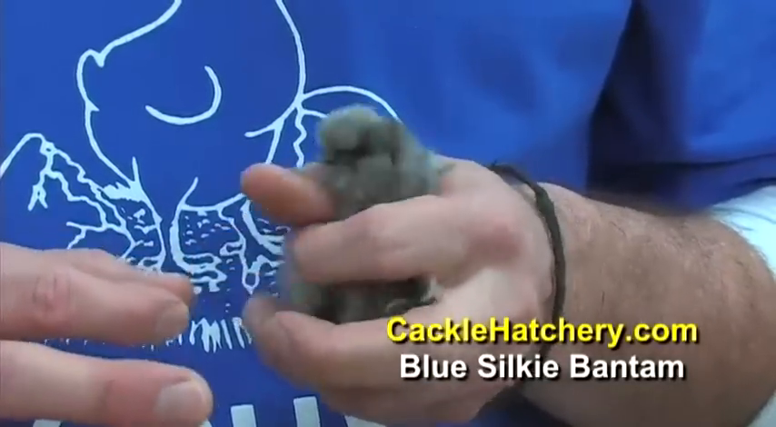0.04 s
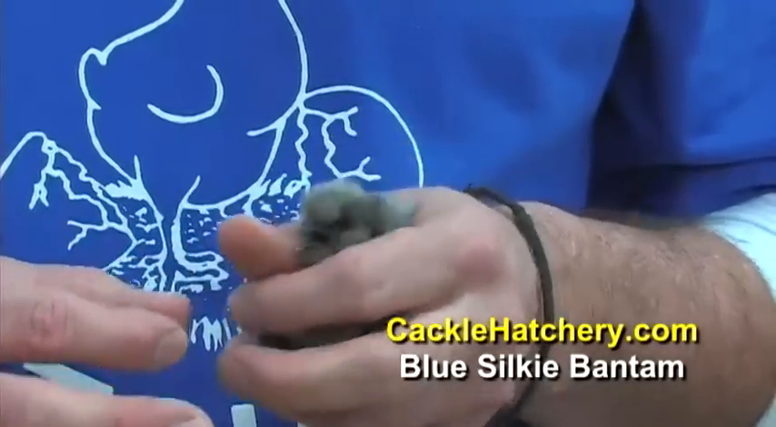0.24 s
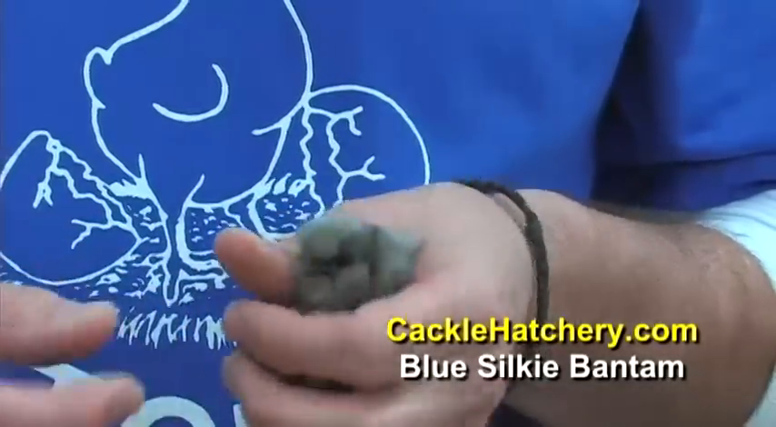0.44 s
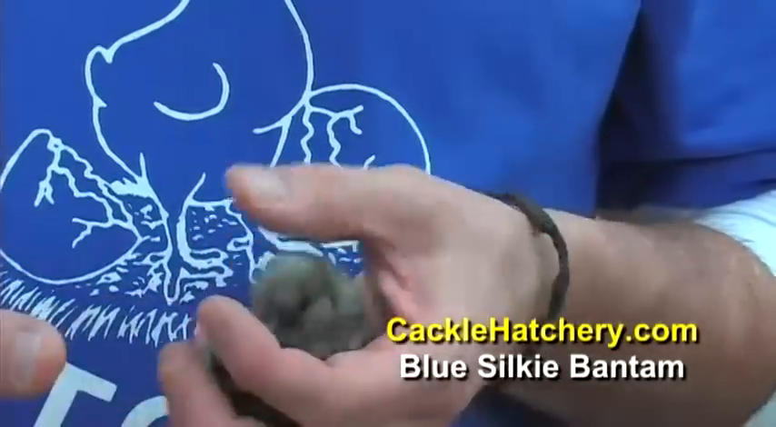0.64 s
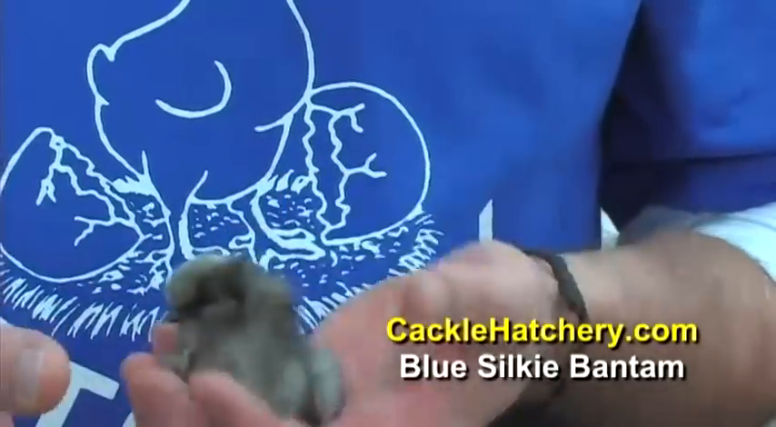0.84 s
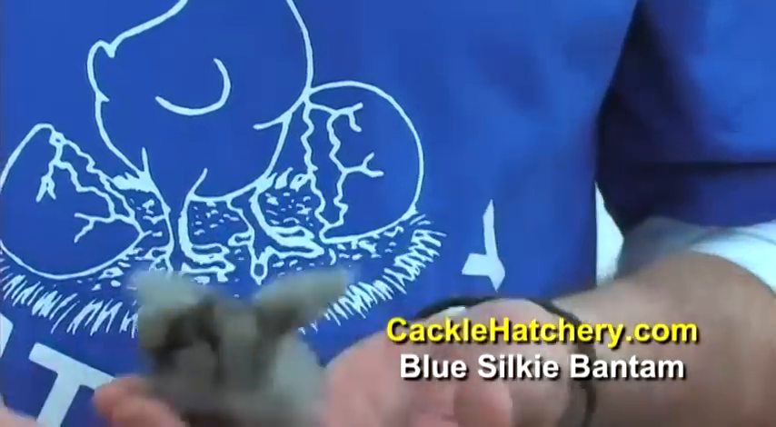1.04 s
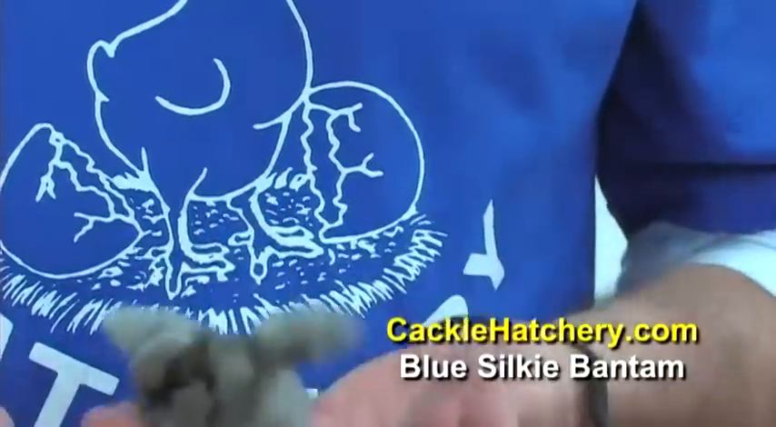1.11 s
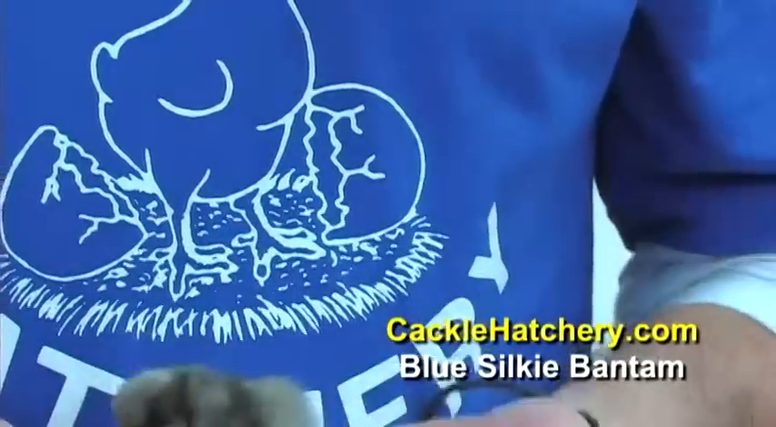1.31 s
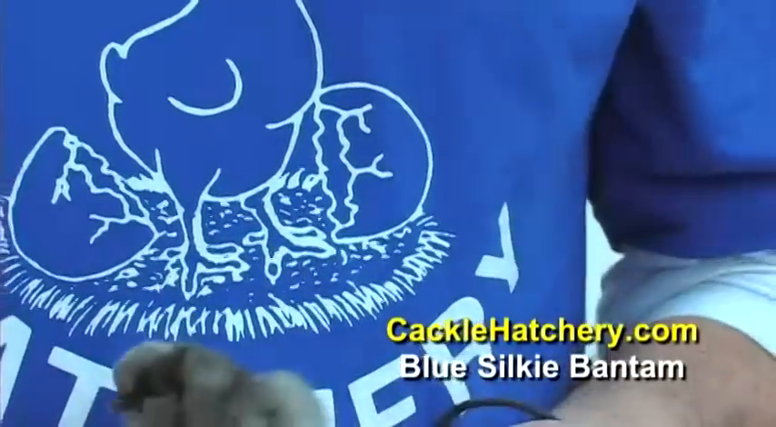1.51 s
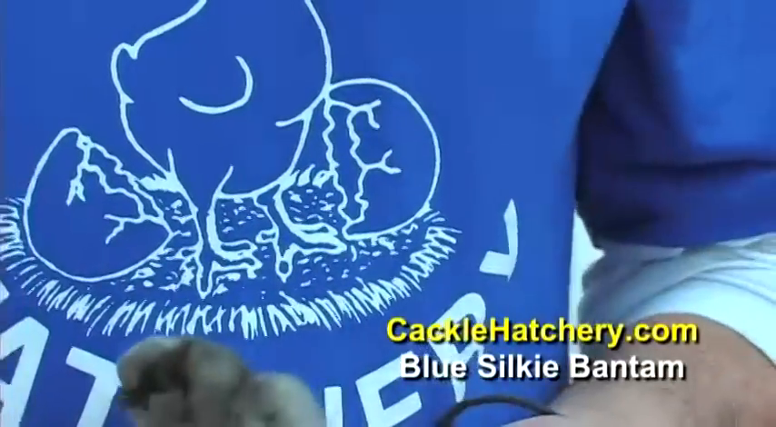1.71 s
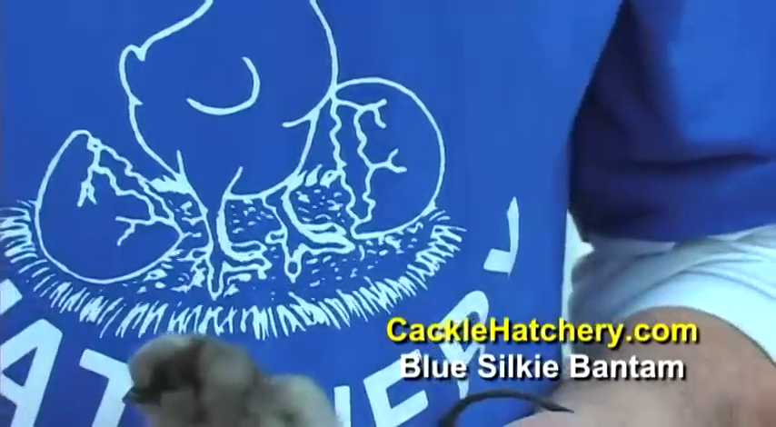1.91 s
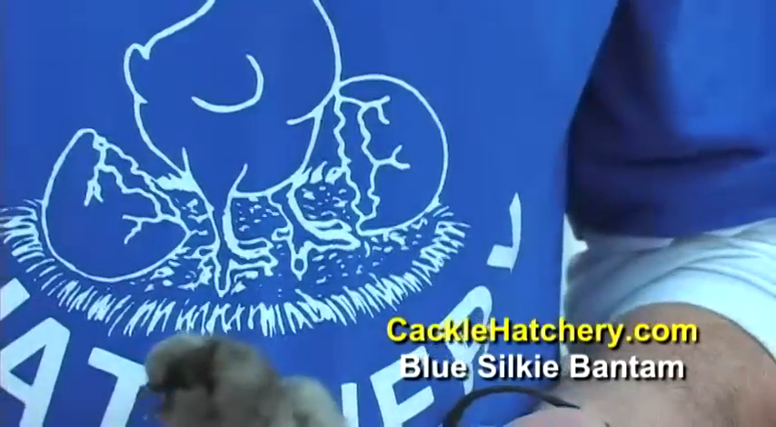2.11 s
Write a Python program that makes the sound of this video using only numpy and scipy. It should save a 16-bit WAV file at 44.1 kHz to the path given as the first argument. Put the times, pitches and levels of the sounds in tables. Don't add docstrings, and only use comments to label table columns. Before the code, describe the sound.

A held chick peeps close up at about 0.2, 0.65, 1.1, 1.45 and 1.8 seconds. Each peep begins with a thin squeak or scratchy creak, then a clear whistle drops quickly; the first is strongest. Softer chicks cheep throughout over low fan hum. Hands brush or tick faintly near 0.15-0.3 and 1.2-1.3 seconds. At 2.1 a faint creak begins an unfinished peep.

```python
import sys
import numpy as np
from scipy import signal
from scipy.fft import rfft, irfft, next_fast_len
from scipy.io import wavfile

SR = 44100
rng = np.random.default_rng(int(sys.argv[2]) if len(sys.argv) > 2 else 0)


def master(y):
    cut = np.clip(np.atleast_2d(y).T, -1, 1)
    pcm = np.round(cut * 32767)
    wavfile.write(sys.argv[1], SR, pcm.astype(np.int16))


def makeup_ratio(level_db):
    decades = np.asarray(level_db, float) / 20
    return 10 ** decades


N = 94815


def rms_one(x):
    return x / np.sqrt(np.mean(x ** 2) + 1e-20)


def at_hz(points, hz):
    table = np.array(points)
    return np.interp(np.log(hz), np.log(table[:, 0]), table[:, 1])


def drift(rate_hz):
    r = np.exp(-2 * np.pi * rate_hz / SR)
    wander = signal.lfilter([1], [1, -2 * r, r * r], rng.standard_normal(N + 4000))
    return rms_one(wander[4000:])


def resonate(x, hz, width_hz):
    r = np.exp(-np.pi * width_hz / SR)
    poles = [1, -2 * r * np.cos(2 * np.pi * hz / SR), r * r]
    return signal.lfilter([(1 - r * r) / 2, 0, (r * r - 1) / 2], poles, x + 1e-18)


def add(out, start_s, x):
    i = max(int(start_s * SR), 0)
    out[i:i + len(x)] += x[:max(N - i, 0)]


def fade(u, share):
    return np.sin(np.pi / 2 * np.clip(np.minimum(u, 1 - u) / share, 0, 1)) ** 2


# time_s, pitch_hz, fundamental_db, octave_db
WHISTLE_1 = [
    (.2381, 3510, -37.5, -60),
    (.2621, 4033, -33.5, -43),
    (.285, 4046, -28, -36),
    (.302, 3877, -27.5, -39),
    (.308, 3605, -24, -29),
    (.331, 3000, -30.5, -16),
    (.343, 2737, -38.5, -13.5),
    (.351, 2354, -51, -25.5),
    (.359, 2060, -48, -46),
]
WHISTLE_2 = [
    (0.668, 4340, -42, -72),
    (0.6917, 4195, -39.5, -59),
    (0.719, 3990, -36, -57),
    (.728, 4016, -33, -48),
    (.739, 3500, -30.5, -39),
    (0.744, 3310, -27, -41.5),
    (0.7459, 3670, -36, -49),
    (0.765, 2990, -37.5, -47),
    (0.784, 2020, -55, -69),
]
WHISTLE_3 = [
    (1.112, 3650, -46, -59),
    (1.136, 3836, -35, -51),
    (1.155, 3795, -31, -48.5),
    (1.162, 3426, -33.5, -29.5),
    (1.179, 3013, -35.5, -25.5),
    (1.191, 2750, -43.5, -35.5),
    (1.196, 2625, -40, -34.5),
    (1.213, 1960, -61, -44.5),
]
WHISTLE_4 = [
    (1.466, 3973, -46.0, -53),
    (1.497, 3926, -41.5, -54.5),
    (1.509, 3787, -37, -44),
    (1.52, 3410, -42.5, -31),
    (1.531, 3170, -55, -21.5),
    (1.536, 2960, -50, -21),
    (1.546, 2815, -44, -29.5),
    (1.556, 2510, -61, -32),
    (1.569, 2050, -57, -40),
]
WHISTLE_5 = [
    (1.817, 3990, -49, -79),
    (1.842, 3850, -40, -46),
    (1.863, 3480, -37.5, -29),
    (1.874, 3100, -44, -18),
    (1.883, 2930, -52, -17.5),
    (1.89, 2766, -53, -25.5),
    (1.893, 2856, -59, -45),
    (1.9, 2405, -47.5, -29),
    (1.911, 1980, -61, -40.5),
]
# frequency_hz, gain_db
OVERTONE_THROAT = [(6000, 0), (7500, -8), (8800, -15), (9500, -27), (10400, -8), (11400, -6), (12400, -21),
                   (14000, -38)]


def whistles():
    edge_s, wobble_share = 0.00093, 0.0028
    third_db, fourth_db, overtone_follows = -54.5, -69, 0.58
    low_rough_db, overtone_rough_db, overtone_rise = 1.2, 4.5, 0.17
    hiss_hz, hiss_width_hz, hiss_db = 14000, 900, -47
    out, wobble, rasp = np.zeros(N), drift(390), drift(180)
    hiss = resonate(rng.standard_normal(N), hiss_hz, hiss_width_hz)
    hiss_noise = rms_one(resonate(hiss, hiss_hz, hiss_width_hz))
    for rows in (WHISTLE_1, WHISTLE_2, WHISTLE_3, WHISTLE_4, WHISTLE_5):
        s, *columns = np.transpose(rows)
        length_s = s[-1] - s[0]
        t = np.arange(s[0], s[-1], 1 / SR)
        first = int(s[0] * SR)
        now = slice(first, first + len(t))
        hz, low_db, octave_db = [np.interp(t, s, c) for c in columns]
        phase = 2 * np.pi * np.cumsum(hz * (1 + wobble_share * wobble[now])) / SR
        swing_db = overtone_follows * (octave_db - third_db)
        fundamental = makeup_ratio(low_db + low_rough_db * rasp[now]) * np.sin(phase)
        hiss_part = makeup_ratio(hiss_db - swing_db / 2 + 6) * hiss_noise[now]
        voice = fundamental + makeup_ratio(octave_db) * (np.sin(2 * phase) + hiss_part)
        rise = np.minimum((t - s[0]) / length_s / overtone_rise, 1)
        for k, db in ((3, third_db), (4, fourth_db)):
            level_db = db + swing_db + at_hz(OVERTONE_THROAT, k * hz) + overtone_rough_db * rasp[now]
            voice = voice + makeup_ratio(level_db) * rise * np.sin(k * phase)
        envelope = fade(np.linspace(0, 1, len(t)), edge_s / length_s)
        add(out, s[0], np.sqrt(2) * voice * envelope)
    return out


# start_s, end_s, level_db, throat_start_hz, last_rate_per_s
CREAK_PUFFS = [
    (0.2277, 0.2648, -31.5, 5340, 285),
    (0.654, 0.6925, -35, 4930, 435),
    (1.103, 1.1286, -39.5, 5310, 885),
    (1.453, 1.468, -37, 5210, 885),
    (1.781, 1.8137, -34, 4540, 946),
    (2.1311, 2.1573, -38.5, 4410, 905),
]
# middle_hz, end_hz, width_hz, upper_resonance_db
CREAK_RESONANCES = [
    (5300, 4900, 1520, -4),
    (5480, 4700, 810, -23),
    (5600, 5600, 1140, -18),
    (5400, 5100, 1160, -21),
    (5330, 5320, 1040, -23),
    (4950, 5600, 740, -27),
]


def creaks():
    first_per_s, slowing, jitter = 950, 1.6, .03
    swell_db, uneven_db, rise = 7, 3, 0.38
    upper_ratio = 1.57
    out, t = np.zeros(N), np.arange(200) / SR
    for (start, end, db, start_hz, last_per_s), throat in zip(CREAK_PUFFS, CREAK_RESONANCES):
        middle_hz, end_hz, width_hz, upper_db = throat
        u = np.linspace(0, 1, int((end - start) * SR))
        rough = signal.lfilter([.1], [1, -.97], rng.standard_normal(3000))[:len(u)]
        own_db = uneven_db * rng.standard_normal(60)
        rate = first_per_s + (last_per_s - first_per_s) * u ** slowing
        rate = rate * (1 + 2 * jitter * rough)
        puffs_left = np.cumsum(rate[::-1])[::-1] / SR + .9
        puff_at = np.flatnonzero(np.diff(np.floor(puffs_left)))[::-1]
        ring = (width_hz * t) ** 3 * np.exp(-7 * width_hz * t)
        creak = np.zeros(len(u) + len(t))
        for i, puff_db in zip(puff_at, own_db):
            throat_hz = np.interp(u[i], [0, .5, 1], [start_hz, middle_hz, end_hz])
            phase = 2 * np.pi * throat_hz * t
            size = makeup_ratio(swell_db * (np.sqrt(u[i]) - 1) + puff_db) * min(u[i] / rise, 1)
            upper = makeup_ratio(upper_db) * np.sqrt(u[i]) * np.sin(upper_ratio * phase)
            creak[i:i + len(t)] += size * ring * (np.sin(phase) + upper)
        add(out, start, makeup_ratio(db) * rms_one(creak))
    return out


def arcs(rows, top_at, rising=False, order=2):
    throat_hz, throat_db_per_oct = 5300, 12
    out, flutter = np.zeros(N), makeup_ratio(2.5 * drift(140))
    for start, end, first, second, db in rows:
        u = np.linspace(0, 1, int((end - start) * SR))
        at = -.25 if first > 6200 else top_at
        if rising:
            top, far, reach = second, first, at
        else:
            top, far, reach = first, second, 1 - at
        hz = top - (top - far) * np.abs((u - at) / reach) ** order
        off_octaves = np.abs(np.log2(hz / throat_hz))
        level_db = db - throat_db_per_oct * (off_octaves - off_octaves.min())
        phase = 2 * np.pi * np.cumsum(hz) / SR
        add(out, start, np.sqrt(2) * makeup_ratio(level_db) * fade(u, .18) * np.sin(phase))
    return out * flutter


# start_s, end_s, from_hz, top_hz, level_db
LEAD_SQUEAKS = [
    (.2221, .2421, 4600, 5200, -33),
    (.643, .69, 4630, 5640, -42.5),
    (1.091, 1.127, 4830, 5810, -44),
    (1.4421, 1.4701, 4880, 5340, -45.5),
    (2.101, 2.161, 4410, 4730, -59),
]


def lead_squeaks():
    return arcs(LEAD_SQUEAKS, 0.6, rising=True)


# time_s, level_db, centre_hz, t60_s
HAND_TOUCHES = [
    (.14, -47, 304, 0.16),
    (0.25, -46, 455, 0.2),
    (1.228, -50, 8000, 0.012),
    (1.308, -47.5, 430, 0.27),
    (1.307, -50.5, 1980, 0.3),
    (.3, -42, 5200, .02),
    (1.952, -56, 10000, .012),
]


def touches():
    out = np.zeros(N)
    for s, db, hz, t60 in HAND_TOUCHES:
        puff = rng.standard_normal(6000) * makeup_ratio(-60 * np.arange(6000) / SR / t60)
        band = resonate(resonate(puff, hz, hz), hz, hz / 2)
        add(out, s, makeup_ratio(db + 16.5) * band * np.sqrt(SR / hz / 20))
    return out


# start_s, end_s, top_hz, end_hz, level_db
BROOD_PEEPS = [(.665, .712, 7100, 5500, -44), (.695, .76, 4740, 4300, -45), (.826, .972, 4810, 3390, -45.5),
               (1.025, 1.082, 7300, 5300, -42.5), (1.02, 1.08, 3700, 2640, -52),
               (1.046, 1.076, 2284, 2100, -52.5), (1.095, 1.14, 4850, 4300, -44.5),
               (1.4, 1.445, 2320, 2230, -53.5), (1.562, 1.585, 2760, 2480, -50),
               (1.913, 1.96, 2370, 2020, -57), (1.955, 2.03, 3790, 2860, -52.5),
               (1.972, 2.031, 7300, 5500, -44.5), (.209, .241, 7540, 6400, -54)]
# start_s, end_s, top_hz, end_hz, level_db
MORE_PEEPS = [(0.312, .354, 2750, 1000, -51), (1.158, 1.19, 2900, 2000, -52), (1.86, 1.895, 2800, 1500, -53),
              (.885, .925, 2800, 2400, -54), (1.349, 1.376, 5860, 5390, -54), (.555, .6, 3100, 2450, -54),
              (0.14, .185, 3450, 2700, -54), (.625, .672, 3000, 2100, -53), (1.698, 1.72, 7200, 6100, -57),
              (2.095, 2.13, 7500, 5700, -59), (1.395, 1.44, 8600, 6500, -60), (1.44, 1.5, 4300, 3500, -50)]
# start_s, end_s, top_hz, end_hz, level_db
HELD_PEEPS = [(0.02, .135, 5050, 2700, -51), (.365, .445, 5000, 4300, -49), (.405, .482, 4680, 4150, -46),
              (.475, .535, 4050, 3100, -48), (.36, .475, 4300, 2650, -54), (.45, .5, 5400, 4700, -54),
              (1.59, 1.72, 4350, 2800, -53), (1.685, 1.785, 4680, 3100, -47), (1.84, 1.94, 4930, 3700, -47),
              (1.99, 2.13, 4300, 3000, -51), (1.715, 1.775, 7050, 5800, -57), (1.765, 1.8, 5700, 5600, -51),
              (1.235, 1.3, 4550, 4000, -54), (1.352, 1.47, 4900, 4150, -42.5),
              (1.32, 1.36, 10300, 8500, -62)]


def brood():
    return arcs(BROOD_PEEPS + MORE_PEEPS, .2) + arcs(HELD_PEEPS, .2, order=3)


def crowd():
    peeps_per_s, centre_hz, spread, fall, level_db = 82, 4300, .16, 0.3, -61
    draw = rng.random((300, 4))[:int(peeps_per_s * N / SR)]
    start = draw[:, 0] * N / SR
    end = start + .05 + 0.065 * draw[:, 2]
    top = centre_hz * np.exp(spread * 3.5 * (draw[:, 1] - .5))
    db = level_db + 8 * (draw[:, 3] - .5)
    return arcs(np.transpose([start, end, top, top * (1 - fall), db]), 0.191)


# frequency_hz, density_db_per_hz
AIR_SPECTRUM = [(18, -47), (30, -25.5), (159, 0.5), (340, -7), (784, -12), (1470, -25), (4280, -11.5),
                (4870, -16), (15400, -41)]
# centre_hz, width_hz, level_db
MOTOR_TONES = [(120, 12, -60), (790, 40, -67), (1171, 14, -74)]
# frequency_hz, likeness
AIR_LIKENESS = [(1000, 1), (2500, 1), (6000, .75), (15000, 0.8)]


def air():
    whine_hz, whine_db = 788, -64
    noise, white = 0, rng.standard_normal((2, 2, N))
    edges = 25 * 2 ** np.arange(0, 9.4, 1 / 3)
    for k, (low, high) in enumerate(zip(edges, edges[1:])):
        band = signal.butter(2, [low, high], "band", fs=SR, output="sos")
        mid, side = signal.sosfilt(band, white[k % 2])
        hz = np.sqrt(low * high)
        alike = np.clip(at_hz(AIR_LIKENESS, hz), -1, 1)
        stereo = np.sqrt(1 + alike) * mid + np.sqrt(1 - alike) * side * [[1], [-1]]
        noise = noise + makeup_ratio(at_hz(AIR_SPECTRUM, hz) + 2 * drift(4.3)) * stereo
    hum = np.zeros(N)
    for hz, width_hz, db in MOTOR_TONES:
        tone = resonate(resonate(rng.standard_normal(N + SR), hz, width_hz), hz, width_hz)
        hum += makeup_ratio(db) * rms_one(tone[SR:])
    whine = np.sqrt(2) * makeup_ratio(whine_db) * np.sin(2 * np.pi * whine_hz * np.arange(N) / SR)
    return makeup_ratio(-49) * rms_one(noise) + hum + whine


def room(x):
    t60_s, wall_cut_hz = 0.18, 8700
    size = next_fast_len(N + SR)
    w = 2 * np.pi * np.arange(size // 2 + 1) / size
    spec, out = rfft(x, size), np.zeros((2, N))
    dull = 1 / (1 + 1j * w * SR / (2 * np.pi * wall_cut_hz * 2))
    for k, lag in enumerate(rng.uniform(.008, .035, 16) * SR):
        loop = makeup_ratio(-60 * lag / SR / t60_s) * dull * np.exp(-1j * w * lag)
        echoes = irfft(spec * loop / (1 - loop), size)[:N]
        out[k % 2] += echoes * (-1) ** (k // 2) / 2
    return out


def ports(x):
    lag_s = 2e-5
    size = next_fast_len(N)
    bins = np.arange(size // 2 + 1)
    turn = np.exp(1j * np.pi * lag_s * SR * bins / size * np.array([[1], [-1]]))
    return irfft(rfft(x, size) * turn, size)[:, :N]


def scene():
    held = whistles() + creaks() + lead_squeaks()
    hands = touches()
    others, far = brood(), crowd()
    wet = room(makeup_ratio(-21.5) * held + makeup_ratio(-30) * others + makeup_ratio(-15) * far)
    return ports(held + others + far + hands) + wet + air()


def band_limit(x):
    return signal.sosfilt(signal.butter(12, 15520, fs=SR, output="sos"), x)


def record(dry):
    return band_limit(dry)


dry = scene()
out = record(dry)
master(out)
```